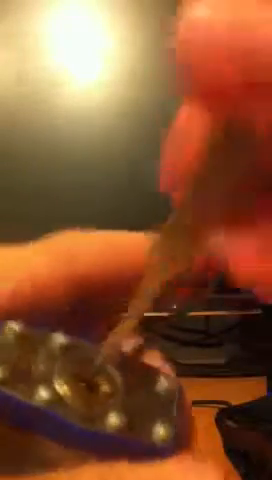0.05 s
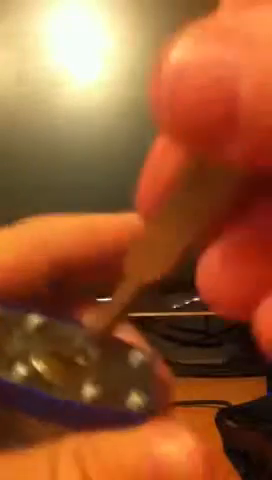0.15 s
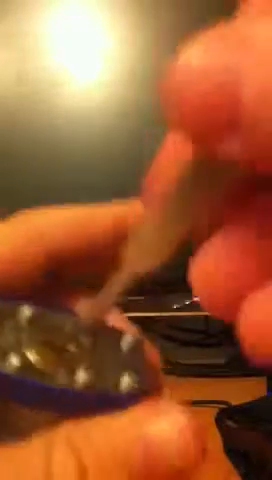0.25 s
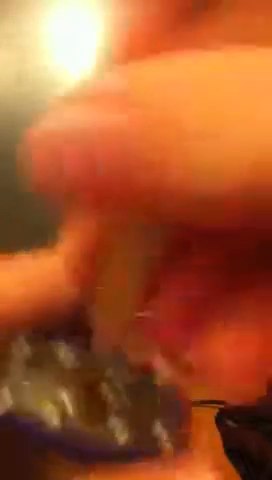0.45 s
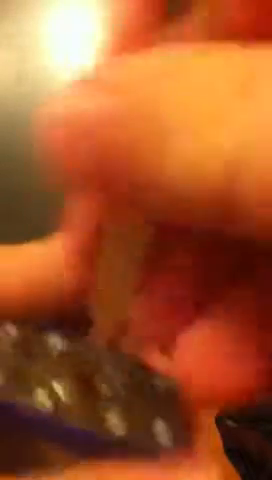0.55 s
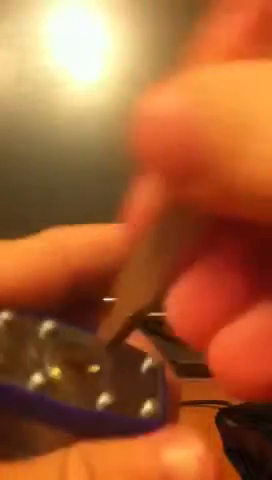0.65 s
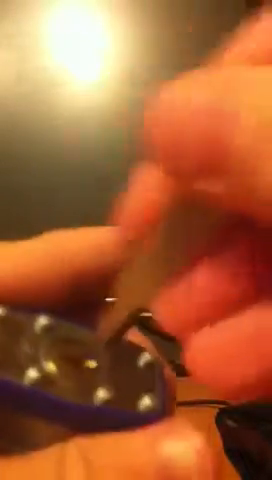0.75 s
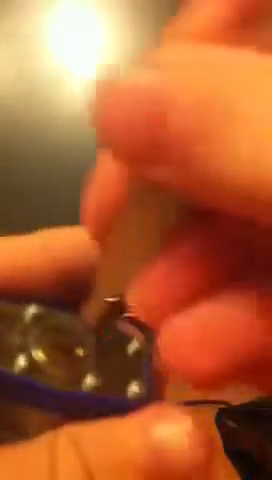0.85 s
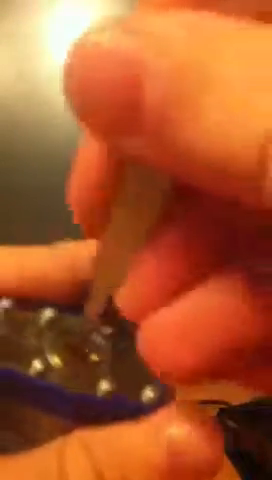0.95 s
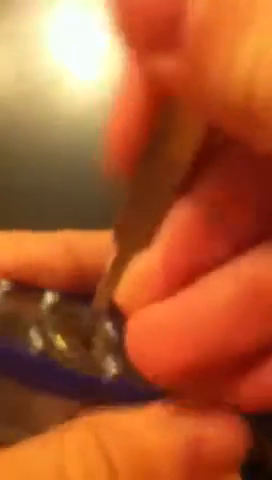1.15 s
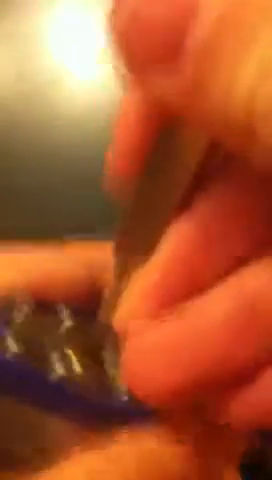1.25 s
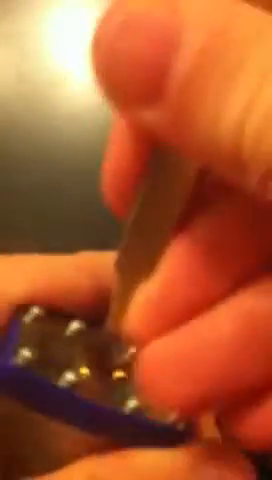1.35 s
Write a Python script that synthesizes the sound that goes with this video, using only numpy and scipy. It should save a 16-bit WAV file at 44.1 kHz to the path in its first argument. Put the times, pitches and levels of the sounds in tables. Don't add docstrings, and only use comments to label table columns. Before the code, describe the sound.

A thin metal pick clicks and scrapes inside a hand-held padlock, very close to a phone microphone; four quick snaps build to the loudest, then fainter ticks, over low appliance rumble and faint hiss in a small room.

```python
import sys
import numpy as np
from scipy import signal
from scipy.fft import rfft, irfft
from scipy.io import wavfile
from scipy.ndimage import uniform_filter1d

SR = 44100
rng = np.random.default_rng(int(sys.argv[2]) if len(sys.argv) > 2 else 0)


def dump_mix(stems):
    frames = np.atleast_2d(stems).T
    limited = np.clip(frames, -1, 1)
    pcm = np.round(limited * 32767).astype(np.int16)
    wavfile.write(sys.argv[1], SR, pcm)


def nominal_scale(level):
    x = np.asarray(level, float) / 20
    return 10 ** x


N = 61739


def ring(x, hz, t60):
    radius = nominal_scale(-60 / (t60 * SR))
    angle = 2 * np.pi * hz / SR
    return signal.lfilter([0, np.sin(angle)], [1, -2 * radius * np.cos(angle), radius ** 2], x + 1e-18)


def rms_one(x):
    return x / np.sqrt(np.mean(x ** 2) + 1e-20)


def clicks(times, size):
    out = np.zeros(N)
    np.add.at(out, (np.asarray(times) * SR).astype(int), size)
    return out


def high_pass(x, hz, order):
    return signal.sosfilt(signal.butter(order, hz, "high", fs=SR, output="sos"), x)


def highs_of(x, hz, order):
    return signal.sosfiltfilt(signal.butter(order, hz, "high", fs=SR, output="sos"), x)


def filtered_noise(gain):
    return rms_one(irfft(rfft(rng.standard_normal(N)) * gain, N))


def coloured(points):
    hz = np.fft.rfftfreq(N, 1 / SR) + 1
    point_hz, point_db = np.transpose(points)
    return filtered_noise(nominal_scale(np.interp(np.log(hz), np.log(point_hz), point_db)))


def floor():
    # (frequency [Hz], level [dB per Hz])
    floor_colour = [(18, -92), (30, -58), (90, -24), (144, -4.5), (237, -8.5), (369, -16.5), (492, -16.5),
                    (1020, -25), (15500, -34.5)]
    # (centre [Hz], width [Hz], level [dB rms])
    rumble = [(115.4, 33, -72.5), (148, 25, -76), (225, 34, -63), (423, 98, -74.5), (820, 100, -76)]
    floor_db = -61
    hz = np.fft.rfftfreq(N, 1 / SR)
    out = nominal_scale(floor_db) * coloured(floor_colour)
    for centre_hz, width_hz, db in rumble:
        peak = 1 / (1 + (2 * (hz - centre_hz) / width_hz) ** 2)
        out += nominal_scale(db) * filtered_noise(peak)
    return out


def room(x):
    # (frequency [Hz], level [dB per Hz])
    room_colour = [(590, -35), (1000, -14), (3570, -6), (4980, -8.5), (8640, -4.5), (10900, -15),
                   (11800, -7), (15500, -2)]
    room_db, build_up_s = -41, 0.0044
    low_t60_s, top_t60_s, top_hz = 0.31, 0.15, 9000
    t = np.arange(SR // 2) / SR
    noise = coloured(room_colour)
    top = highs_of(noise, top_hz, order=2)
    out = np.zeros(N)
    for part, t60 in ((noise - top, low_t60_s), (top, top_t60_s)):
        decay = nominal_scale(-60 * t / t60) * (1 - np.exp(-t / build_up_s))
        power = signal.fftconvolve(x ** 2, decay ** 2)[:N]
        out += part * np.sqrt(np.abs(power))
    return nominal_scale(room_db) * out


def bumps():
    # (time [s], peak level [dB], pitch [Hz], knock level re bump [dB], knock pitch [Hz])
    bump_table = [
        (0.054, -42, 174, -13.5, 694),
        (0.2173, -39, 274, -2, 730),
        (.355, -34, 265, -5.5, 754),
        (0.569, -37, 198, -6.5, 560),
        (0.578, -35.5, 311, -5, 712),
        (0.7242, -52, 262, 3.5, 684),
    ]
    bump_t60_s, knock_t60_s = 0.033, 0.022
    out = np.zeros(N)
    for s, db, hz, knock_db, knock_hz in bump_table:
        out += ring(clicks([s], nominal_scale(db)), hz, bump_t60_s)
        out += ring(clicks([s], nominal_scale(db + knock_db)), knock_hz, knock_t60_s)
    return out


def slides():
    # (start [s], length [s], level [dB rms], centre pitch [Hz])
    slide_table = [
        (.052, 0.026, -51.5, 5300),
        (0.212, 0.013, -45.5, 5100),
        (0.354, 0.015, -43.5, 6240),
        (0.565, 0.013, -46, 4800),
        (.709, 0.016, -63, 6000),
        (1.029, 0.024, -66, 5770),
        (1.136, 0.042, -64.5, 6000),
        (1.231, 0.0099, -64.5, 6000),
    ]
    grains_per_s, grain_t60_s = 5500, 0.0012
    tip_hz, tip_db = 14000, 0
    dull_hz, dull_db = 1900, -5
    t = np.arange(N) / SR
    hits = rng.random((3, N)) < grains_per_s / SR
    grains = hits * rng.standard_normal((3, N)) * rng.exponential(1, (3, N))
    tip = nominal_scale(tip_db) * rms_one(ring(grains[1], tip_hz, grain_t60_s))
    dull = nominal_scale(dull_db) * rms_one(ring(grains[2], dull_hz, grain_t60_s))
    out = np.zeros(N)
    for start, length, db, centre_hz in slide_table:
        stroke = np.sin(np.pi * np.clip((t - start) / length, 0, 1)) ** 0.76
        scrape = rms_one(ring(grains[0], centre_hz, grain_t60_s))
        out += nominal_scale(db) * stroke * (scrape + tip + dull)
    return out


def focus(hz, centre_hz):
    width_oct, skirt_db = 0.22, -15
    return np.exp(-0.5 * (np.log2(hz / centre_hz) / width_oct) ** 2) + nominal_scale(skirt_db)


def shiver(times, db):
    shiver_db, shiver_t60_s, shiver_hz = -21.5, 0.024, 6000
    uneven = rng.standard_normal(N) * rng.exponential(1, N)
    rattle = rms_one(ring(uneven, shiver_hz, 0.001))
    fade = nominal_scale(-60 / (shiver_t60_s * SR))
    return rattle * signal.lfilter([1], [1, -fade], clicks(times, nominal_scale(db + shiver_db)))


def contacts():
    # (time [s], peak level [dB], centre pitch [Hz], tip
    # level re snap [dB], tip pitch [Hz])
    contact_table = [(.0550, -31, 7140, -16, 14700), (.0626, -33, 7030, -2.5, 12300),
                     (0.0626, -34, 6900, -3, 15100), (.0642, -33, 2500, 2, 15500),
                     (0.2146, -27.5, 5030, -13, 14600), (0.218, -28.5, 7440, 2.5, 13500),
                     (0.218, -28.5, 7600, 4, 15000), (0.2186, -20.5, 5530, -8, 11900),
                     (0.2198, -22.5, 3350, -8, 14700), (.2217, -64, 3860, -8, 14500),
                     (.3556, -31.5, 6900, -12, 11600), (0.3594, -31, 6850, -1, 14100),
                     (0.3583, -36.5, 8300, 0, 14600), (0.3609, -20.5, 5700, -13, 12000),
                     (.3607, -31.5, 1770, -12, 14000), (0.5693, -26.5, 2540, -17, 15100),
                     (.5766, -27.5, 4670, 7.5, 13300), (.5790, -7.5, 2750, -21, 14600),
                     (.5791, -9.5, 5550, -5.5, 14200), (0.7101, -43, 7240, -12, 14000),
                     (0.716, -50, 7970, 0, 14000), (.7225, -63, 6400, -12, 14000),
                     (0.7239, -23, 5150, -20, 14500), (0.7622, -37.5, 7470, -27, 14000),
                     (0.7102, -43.5, 3700, -16, 11100),
        (0.7607, -41.5, 3250, -21, 12000),
        (0.762, -39.5, 1830, -13, 14000),
        (1.0259, -39, 6800, -8, 14400),
        (1.0347, -44.5, 3870, -9, 13000),
        (1.167, -51, 3800, 2, 10800),
        (1.2346, -43, 5680, 9.5, 14700),
        (1.2700, -56.5, 3520, 7.5, 10800),
        (1.0700, -52.5, 7100, -1, 13000),
        (1.289, -53.5, 4050, 1, 8000),
    ]
    # (pitch [Hz], level [dB])
    body_modes = [(1850, -5.5), (2600, -11), (3670, 0), (5300, -5), (6200, -6), (7300, 4.5), (8300, -6.5),
                  (9100, -1), (12500, 1), (15000, -24)]
    snap_t60_s, tip_t60_s, body_t60_s = 0.0022, 0.003, 0.005
    modes_db, strike_spread_db = -9.5, 6.5
    times, db, centre_hz, tip_db, tip_hz = np.transpose(contact_table)
    out = np.zeros(N)
    for i, s in enumerate(times):
        out += ring(clicks([s], nominal_scale(db[i])), centre_hz[i], snap_t60_s)
        out += ring(clicks([s], nominal_scale(db[i] + tip_db[i])), tip_hz[i], tip_t60_s)
    for k, (hz, level_db) in enumerate(body_modes):
        luck_db = strike_spread_db * rng.standard_normal(len(times))
        size = nominal_scale(db + modes_db + level_db + luck_db) * focus(hz, centre_hz)
        out += ring(clicks(times, (-1) ** k * size), hz, body_t60_s)
    return out + shiver(times, db)


def scene():
    lock = high_pass(contacts(), 1650, order=6) + high_pass(slides(), 900, order=4)
    hand = high_pass(bumps(), 90, order=2)
    hiss_limit = signal.cheby2(12, 50, 16100, fs=SR, output="sos")
    background = signal.sosfilt(hiss_limit, floor() + room(lock))
    return (lock + hand + background)[None]


def roll_off(x):
    return signal.sosfilt(signal.butter(12, 16810, fs=SR, output="sos"), x)


def record(dry):
    # (start [s], length [s], above [Hz], change [dB])
    lost_highs = [
        (.5610, .0065, 1400, -30),
        (.2288, .0052, 2000, -14),
        (.3705, .003, 10500, -25),
        (.7010, .007, 8000, -12),
        (.7350, .020, 7000, -22),
        (1.038, .008, 7500, -12),
        (1.243, .013, 6000, -20),
    ]
    t = np.arange(N) / SR
    out = dry.copy()
    for start, length, hz, db in lost_highs:
        inside = (t > start) & (t < start + length)
        gate = uniform_filter1d(1.0 * inside, size=30)
        out = out - (1 - nominal_scale(db)) * gate * highs_of(out, hz, order=4)
    top_cut = signal.cheby2(10, 60, 17200, fs=SR, output="sos")
    mix = signal.sosfilt(top_cut, out)
    return roll_off(mix)


dry = scene()
out = record(dry)
dump_mix(out)
```